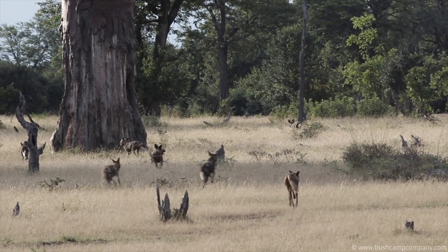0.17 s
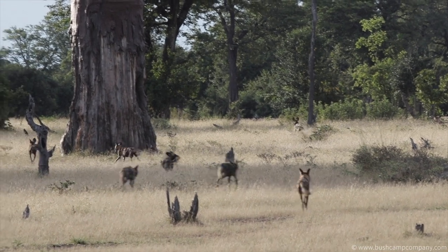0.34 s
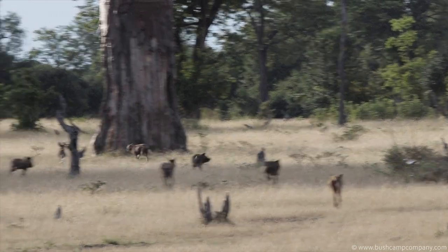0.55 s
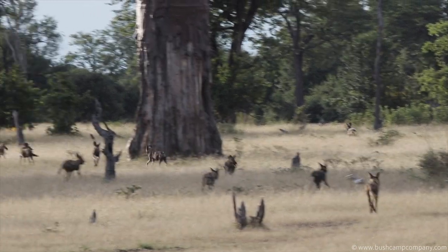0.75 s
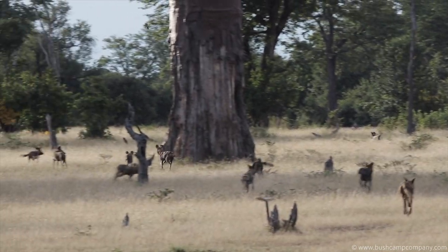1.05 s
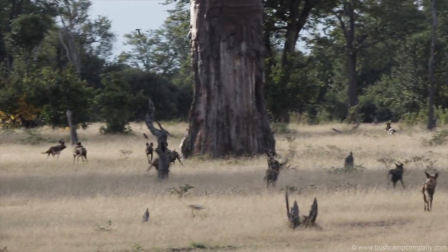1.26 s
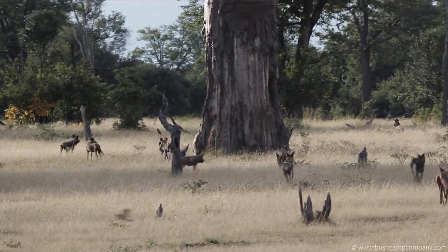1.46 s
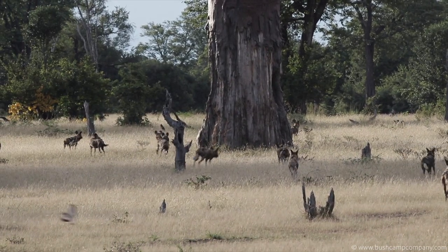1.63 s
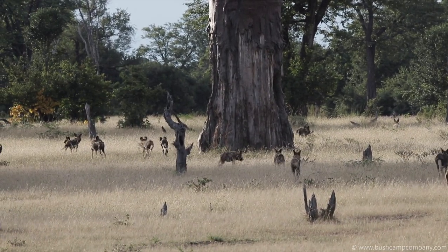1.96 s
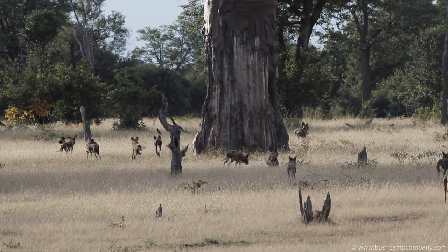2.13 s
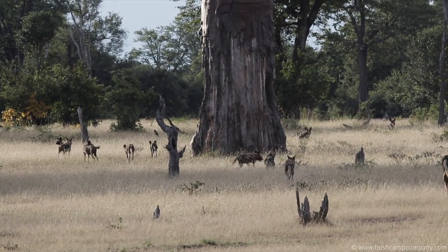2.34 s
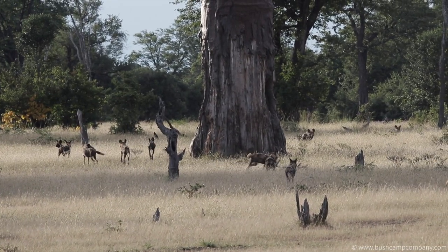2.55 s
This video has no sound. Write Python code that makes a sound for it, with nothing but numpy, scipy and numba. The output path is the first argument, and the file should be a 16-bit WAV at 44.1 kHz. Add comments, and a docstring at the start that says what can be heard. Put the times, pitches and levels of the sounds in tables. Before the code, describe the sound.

Bird-like twittering from a pack of wild dogs at some distance, rapid and overlapping, with a short tail from trees; low wind buffets an outdoor camera microphone, strongest early, easing later, above soft hiss.

```python
"""Dry woodland clearing, the camera microphone out in gusty wind that buffets its two ports, mostly the right.
Several animals twitter some way off: harmonic voices slide up and swell, most then drop, with a short tail
from the trees. Rasp and breath noise roughen them. The wind is low-passed noise, its corner rising with level.
Two small knocks on the microphone body are decaying noise bands; a dry high rustle swells once.
A faint, wavering hiss of shaped noise, mostly unrelated left and right, lies under all."""
import sys
import numpy as np
from scipy import signal
from scipy.fft import rfft, irfft
from scipy.io import wavfile
from scipy.ndimage import uniform_filter1d, map_coordinates
from numba import njit

SR = 44100
rng = np.random.default_rng(int(sys.argv[2]) if len(sys.argv) > 2 else 0)


def log_audio(samples):
    """Write samples as a 16-bit WAV file to the path given in sys.argv[1]."""
    # one column per channel
    frames = np.atleast_2d(samples).T
    # limit to full scale, then quantise
    limited = np.clip(frames, -1, 1)
    pcm = np.round(limited * 32767).astype(np.int16)
    wavfile.write(sys.argv[1], SR, pcm)


N = 119070

# Background hiss, spectral density: [f/Hz, relative level/dB]
AIR_SPECTRUM = [(100, -12), (300, -7), (500, -7), (720, -7.5), (950, -15.5), (1400, -14), (2500, -15.5),
                (3800, -22), (5500, -22.5), (8000, -20), (13000, -26.5), (15500, -34)]
# Lean of the hiss between the sides: [f/Hz, left minus right/dB]
AIR_LEAN = [(100, -7.5), (700, -2.5), (2400, -5.5), (4400, 0), (15000, -.5)]
# Wind level on each port: [t/s, level/dB]
WIND_LEFT_PORT = [(0.0, -52), (0.249, -44), (0.289, -32), (0.339, -47), (0.379, -34), (0.419, -42),
                  (0.464, -38), (0.544, -38.5), (0.599, -63), (0.728, -26.5), (0.763, -42), (0.838, -38),
                  (0.918, -47), (0.983, -37.5), (1.147, -49), (1.272, -45), (1.302, -59), (1.322, -36.5),
                  (1.367, -47), (1.412, -53), (1.566, -44), (1.611, -56), (1.726, -58), (1.801, -47),
                  (1.846, -61), (2.005, -80), (2.075, -41), (2.12, -69), (2.18, -58), (2.225, -31),
                  (2.27, -67), (2.335, -59), (2.444, -35), (2.484, -49), (2.599, -58), (2.699, -51)]
WIND_RIGHT_PORT = [(0.0, -46), (0.015, -41.5), (0.12, -45.5), (0.19, -47.5), (0.234, -18), (0.324, -35.5),
                   (0.349, -22), (0.459, -19), (0.544, -31), (0.614, -25), (0.634, -38.5), (0.673, -44.5),
                   (0.738, -27), (0.813, -25), (0.868, -31.5), (0.903, -24.5), (0.923, -34.5),
                   (0.968, -40.5), (0.988, -29.5), (1.023, -37), (1.137, -22.5), (1.197, -29.5),
                   (1.222, -19), (1.247, -29), (1.302, -23), (1.457, -29), (1.502, -26.5), (1.561, -33),
                   (1.626, -28.5), (1.661, -40), (1.686, -31), (1.796, -38.5), (1.916, -30), (2.015, -36.5),
                   (2.035, -33.5), (2.085, -37.5), (2.14, -35.5), (2.175, -46.5), (2.29, -28), (2.32, -39),
                   (2.38, -38.5), (2.405, -37.5), (2.499, -46), (2.649, -50.5), (2.679, -46), (2.699, -44)]
# Small knocks on the microphone body:
# [t/s, starting level/dB, centre f/Hz, 60 dB decay/s, left minus right/dB]
BODY_KNOCKS = [(.229, -32.5, 730, 0.012, -21), (.407, -34.5, 1500, 0.054, -9.5)]
# Animal calls: [t of the slide's top/s, rise/s, start f/Hz, top f/Hz, level of second harmonic at the top/dB,
# roughness/0-1, left minus right/dB, fundamental/dB, overtones/dB, breath/dB]
# The last three are relative to the second harmonic; the tables below and the slide shift them further.
CALLS = [(.04, 0.083, 1400, 1495, -48.5, 0.26, -4, -8, -17, -3.5),
         (.125, .125, 950, 1443, -44.5, 0.13, -9, -11.5, -11, -7.5),
         (.262, 0.089, 1190, 1510, -46, .2, -9, -11, -26, -10),
         (.362, .13, 1000, 1397, -46, 0.1, -10, -11, -14.5, -12),
         (.41, .12, 880, 1110, -50, 0.33, -7, -9, -34, -0.5),
         (.52, .17, 1330, 1770, -46, 0.1, -2, -13, -18, -10),
         (.535, .125, 1059, 1450, -36.5, 0, -8, -12.5, -12.5, -5),
         (.602, 0.053, 1320, 1420, -48.5, 0.17, -8, -6, -3, -8),
         (.73, .08, 1322, 1450, -55, 0.27, -10, -2, -18, -6),
         (.775, .05, 1372, 1450, -61, .5, -11, 3, 3, 6),
         (.81, 0.11, 1300, 1746, -55, 0.53, -8, -6, -20, -3),
         (.842, 0.12, 1000, 1406, -50, 0.01, -7, -1.5, -6, -5),
         (1.03, 0.16, 1330, 1614, -59, 0.61, -7, -20, -19, 0),
         (1.1, 0.12, 950, 1387, -48, 0, -7.5, -2, -7, -8),
         (1.27, 0.15, 1350, 1650, -46, 0.26, -7, -20, -14, -2),
         (1.322, .085, 1300, 1430, -39.5, 0.07, -10, -17, -4.5, -4.5),
         (1.335, .15, 1110, 1307, -46.5, 0.08, -9, -8.5, -5.5, -15),
         (1.364, 0.043, 1300, 1460, -42, 0.25, -7.5, -6.5, -10, -10),
         (1.39, .05, 1350, 1530, -50.5, 0, -8, -13, -14, -3),
         (1.58, .09, 1200, 1528, -56.5, 0.2, -7, 6, 4, 7),
         (1.6, .135, 870, 1375, -42.5, 0, -9, -6.5, -9.5, -14),
         (1.788, 0.094, 1140, 1514, -43, 0.29, -8, -12, -6.5, -6.5),
         (1.845, 0.054, 1200, 1030, -51.5, 0.3, -8, -18, -20, -23),
         (1.865, .14, 962, 1365, -44, 0.22, -6.5, -6, -7.5, -8.5),
         (2.008, .1, 1170, 1518, -44.5, 0.29, -11, -10.5, -11.5, -8.5),
         (2.1, 0.061, 1400, 1650, -57, .5, -8, -17, -16, -2),
         (2.147, 0.12, 960, 1325, -42, .1, -8.5, -11, -9, -14),
         (2.212, 0.085, 1250, 1520, -53, .25, -9, -3, -5, -5),
         (2.315, 0.077, 1280, 1424, -48.5, 0.43, -11, -9, -31, -3.5),
         (2.335, .09, 1450, 1730, -55.5, 0.26, -10, -3, -16, 3),
         (2.402, .065, 1460, 1535, -42.5, 0.19, -10, -3, -19, -3),
         (2.436, .035, 1470, 1555, -45, 0.2, -8, -14, -17, -13),
         (2.468, 0.1, 1030, 1336, -44.5, 0.1, -10, -9.5, -14, -17),
         (2.657, .11, 1090, 1532, -45.5, 0.22, -12, -10, -11.5, -12),
         (2.72, .1, 950, 1200, -49, 0.1, -9, -12, -13, -7)]
# Breath noise in the voices: [f/Hz, relative level/dB]
BREATH_SPECTRUM = [(900, -32), (1500, -14), (2800, 8.5), (4500, -4.5), (6000, -7), (8500, -5.5),
                   (12000, -21), (15500, -32)]
# Harmonics 3 to 7, added to each call's overtones: [level/dB]
UPPER_HARMONICS_DB = [4.5, -2, 1.5, -3.5, -16]

AIR_DB, AIR_FLICKER_DB = -51.5, .7
AIR_ALIKE = 0.24  # share of the noise power common to both sides before shaping
RUSTLE_FROM_S, RUSTLE_S, RUSTLE_DB, RUSTLE_HZ = 2.2, .23, -57, 8200
WIND_CORNER_HZ, WIND_HZ_PER_DB = 235.6, 7  # right port at -19 dB; stronger wind is brighter
WIND_LOW_HZ, LEFT_DULL = 41.7, 0.72  # low cut; corner factor of the left port
EDDY_PER_S, EDDY_DB, GUST_S = 70, 5, 0.028
SCOOP_SHARE, SCOOP_BEND = .55, 4  # a quick scoop starts the slide, the rest is a straight rise
DROP_S, DROP_SHARE = 0.0268, 0.1136  # fall after the top, as a share of the pitch
HOARSE_HZ, HIGH_VOICE_HZ = 1480, 1600  # tops above the first trill; above the second they fade without a drop
HOARSE_DROP_SHARE, HOARSE_DULL_DB = .2, -14  # hoarse voices drop further; harmonics from the fourth are weaker
TRILL_HZ, TRILL_SHARE = 130, .055
WOBBLE, RASP_HZ = .007, 350  # pitch wobble share before roughness widens it
SWELL_DB, LATE_DB = 9, 10  # rise along the slide; extra rise of all harmonics but the second
PATCHY_DB, PATCHY_PER_S = 1.6, 80  # each harmonic flickers on its own
TREBLE_PAN = 0.68  # overtones and breath lean less to one side
TREES_T60_S, TREES_DB, LEFT_LEAD_S = 0.081, -10, .00007
TOP_HZ = 15600


def undb(db):
    """Amplitude factor of a level in dB."""
    return 10 ** (np.asarray(db) / 20)


def unit(x):
    """Scale to rms 1."""
    return x / np.sqrt(np.mean(x ** 2))


def on_log(hz, table):
    """Read a (Hz, value) table on a log-frequency axis."""
    table = np.array(table)
    return np.interp(np.log(np.maximum(hz, 1)), np.log(table[:, 0]), table[:, 1])


def coloured(table):
    """Noise with the spectrum of a (Hz, dB) table, rms 1."""
    hz = np.arange(N // 2 + 1) * SR / N
    return unit(irfft(rfft(rng.standard_normal(N)) * undb(on_log(hz, table)), N))


def walk(rate):
    """Random levels, `rate` a second, joined by straight slews; rms 1."""
    k = int(SR / rate)
    steps = np.repeat(rng.standard_normal(N // k + 1), k)
    return unit(uniform_filter1d(steps, k)[:N])


def pan(db):
    """Gains of left and right for a left-minus-right level, their mean kept at 1."""
    gains = undb(np.array([db, -db]) / 2)
    return 2 * gains / gains.sum(axis=0)


@njit
def low(x, hz):
    """State-variable low-pass whose corner moves sample by sample."""
    y, band, level = np.empty(len(x)), 0., 0.
    for i in range(len(x)):
        g = np.tan(np.pi * hz[i] / SR)
        v = (band + g * (x[i] - level)) / (1 + g * (g + 1.3))
        y[i] = level + g * v
        band, level = 2 * v - band, level + 2 * g * v
    return y


def air():
    """Faint hiss: shaped noise, mostly unrelated left and right, wavering a little."""
    hz = np.arange(N // 2 + 1) * SR / N
    common = np.sqrt(AIR_ALIKE) * rng.standard_normal(N)
    sides = []
    for sign in (1, -1):
        noise = common + np.sqrt(1 - AIR_ALIKE) * rng.standard_normal(N)
        gain = undb(on_log(hz, AIR_SPECTRUM) + sign * on_log(hz, AIR_LEAN) / 2)
        sides.append(irfft(rfft(noise) * gain, N))
    return unit(np.array(sides) * undb(AIR_FLICKER_DB * walk(6))) * undb(AIR_DB)


def rustle():
    """A dry high rustle: a band of noise, its level grainy, that swells and fades once."""
    progress = np.clip((np.arange(N) / SR - RUSTLE_FROM_S) / RUSTLE_S, 0, 1)
    band = [(RUSTLE_HZ * 0.59, -30), (RUSTLE_HZ * 0.96, 0), (RUSTLE_HZ * 1.1, 0), (RUSTLE_HZ * 1.45, -30)]
    noise = np.array([coloured(band), coloured(band)])
    return noise * np.sin(np.pi * progress) * undb(RUSTLE_DB + 4.3 * walk(60))


def wind():
    """Eddies of uneven size thump each port on its own; turbulence is brighter when strong."""
    t, ports = np.arange(N) / SR, []
    low_cut = signal.butter(3, WIND_LOW_HZ, "high", fs=SR, output="sos")
    span = int(GUST_S * SR)
    for table, dull in ((WIND_LEFT_PORT, LEFT_DULL), (WIND_RIGHT_PORT, 1)):
        db, eddy = np.interp(t, *np.array(table).T), walk(EDDY_PER_S)
        hz = np.clip(dull * (WIND_CORNER_HZ + WIND_HZ_PER_DB * (db + 19 + 2 * eddy)), 50, 900)
        rumble = low(low(rng.standard_normal(N), hz), 1.61 * hz)
        # the square root evens out the power as the band widens
        rumble = signal.sosfilt(low_cut, rumble / np.sqrt(hz) * undb(EDDY_DB * eddy))
        # over a gust's span the table sets the level; shorter eddies remain
        power = uniform_filter1d(uniform_filter1d(rumble ** 2, span), span)
        ports.append(rumble / np.sqrt(power + 1e-12) * undb(db))
    return np.array(ports)


def knocks():
    """Small knocks on the microphone body: broad noise bands that die away quickly."""
    out, n = np.zeros((2, N)), np.arange(SR // 10) / SR
    for start_s, db, hz, t60, pan_db in BODY_KNOCKS:
        sos = signal.butter(2, [hz * .6, hz * 1.6], "band", fs=SR, output="sos")
        noise = unit(signal.sosfilt(sos, rng.standard_normal(len(n))))
        tick = noise * undb(db - 60 * n / t60)
        i = int(start_s * SR)
        out[:, i:i + len(n)] += pan(pan_db)[:, None] * tick
    return out


def call_pitch(from_hz, top_hz, up, down, trill):
    """Upward slide, then a drop; `up` falls 1 to 0 before the top, `down` rises 0 to 1 after it."""
    hoarse = top_hz > HOARSE_HZ
    drop = HOARSE_DROP_SHARE if hoarse else DROP_SHARE
    if top_hz > HIGH_VOICE_HZ:
        drop = 0
    slide = SCOOP_SHARE * up ** SCOOP_BEND + (1 - SCOOP_SHARE) * up
    hz = (top_hz - (top_hz - from_hz) * slide) * (1 - drop * np.sin(np.pi * down / 2))
    # the trill is a falling sawtooth, deepest early in the slide
    return hz * (1 + hoarse * TRILL_SHARE * np.sqrt(up + 0.067) * (1 - 2 * trill))


def harmonic_levels(low_db, over_db, hoarse, up, down):
    """Levels of harmonics 1 to 7 against the second; the others come late, the upper ones leave early."""
    levels = [low_db - LATE_DB * up, 0]
    for n, own_db in enumerate(UPPER_HARMONICS_DB):
        dull_db = HOARSE_DULL_DB * hoarse * (n > 0)
        levels.append(over_db + own_db - LATE_DB * (up + down) + dull_db)
    return levels


def among_trees(calls):
    """Short diffuse reflections: a decaying noise tail from 8 ms on, separate left and right."""
    n = np.arange(SR // 2) / SR
    tail = rng.standard_normal((2, len(n))) * undb(-60 * n / TREES_T60_S) * (n > .008)
    tail /= np.sqrt((tail ** 2).sum(axis=1, keepdims=True))
    return calls + undb(TREES_DB) * signal.fftconvolve(calls, tail, axes=1)[:, :N]


def animals():
    """Harmonic voices slide up and swell, then break off; rough ones rasp and wobble more."""
    out, t = np.zeros((2, N)), np.arange(N) / SR
    wobble, rasp, patch = walk(90), walk(RASP_HZ), walk(PATCHY_PER_S)
    breath = np.array([coloured(BREATH_SPECTRUM), coloured(BREATH_SPECTRUM)])
    breath[0] = np.sqrt(.5) * breath.sum(axis=0)  # left shares half its power with the right
    trill = np.cumsum(TRILL_HZ * (1 + .2 * walk(40)) / SR) % 1
    for k, call in enumerate(CALLS):
        top_s, rise_s, from_hz, top_hz, db, rough, pan_db, low_db, over_db, breath_db = call
        rough = np.clip(rough, .1, 1)  # no voice is quite clean
        hoarse = top_hz > HOARSE_HZ
        i = np.flatnonzero((t > top_s - rise_s) & (t < top_s + DROP_S))
        j = (i + 7919 * k) % N  # each call reads its own stretch of the random signals
        up = np.clip((top_s - t[i]) / rise_s, 0, 1)
        down = np.clip((t[i] - top_s) / DROP_S, 0, 1)

        hz = call_pitch(from_hz, top_hz, up, down, trill[j])
        phase = 2 * np.pi * np.cumsum(hz * (1 + WOBBLE * (1 + 4 * rough) * wobble[j])) / SR
        treble_sides = pan(pan_db * TREBLE_PAN)[:, None]
        tone = 0
        for n, level in enumerate(harmonic_levels(low_db, over_db, hoarse, up, down)):
            sides = treble_sides if n > 1 else pan(pan_db)[:, None]
            flicker = PATCHY_DB * patch[(j + 5003 * n) % N]
            tone = tone + sides * undb(level + flicker) * np.sin((n + 1) * phase + n * n)

        rasping = tone * (np.sqrt(1 - rough) + np.sqrt(rough) * rasp[j])
        hiss = treble_sides * undb(breath_db) * (1 - down) * breath[:, j]
        fade = (1 - down) ** 2 if hoarse else 1 - down ** 2
        attack = np.minimum((1 - up) * 8, 1)
        out[:, i] += (rasping + hiss) * undb(db - SWELL_DB * up) * attack * fade
    # the calls reach the left port slightly earlier
    out[0] = map_coordinates(out[0], [np.arange(N) + LEFT_LEAD_S * SR], mode="nearest")
    return among_trees(out)


def scene():
    """The clearing at the microphone, background to main source."""
    return air() + rustle() + wind() + knocks() + animals()


def record(dry):
    """The camera cuts the top with a steep elliptic low-pass."""
    return signal.sosfilt(signal.ellip(12, .2, 70, TOP_HZ, fs=SR, output="sos"), dry)


dry = scene()
out = record(dry)
log_audio(out)
```